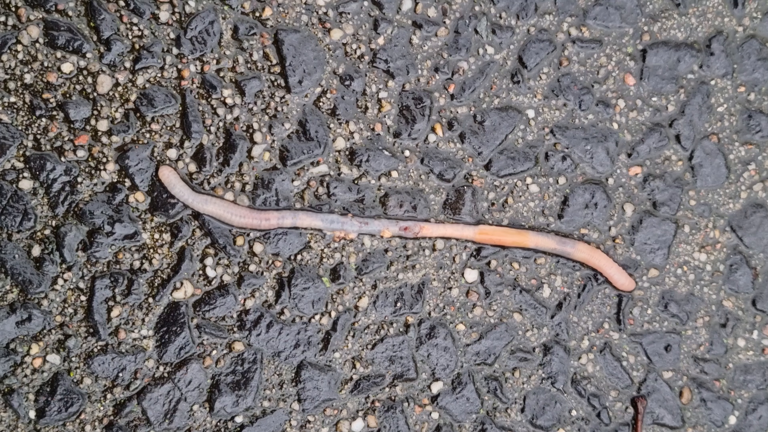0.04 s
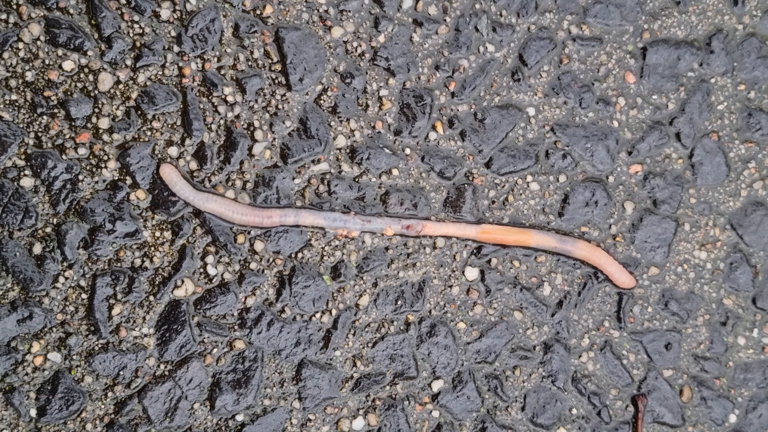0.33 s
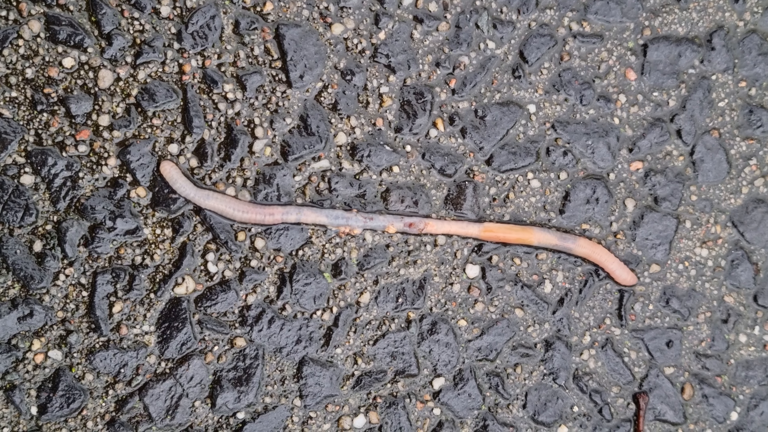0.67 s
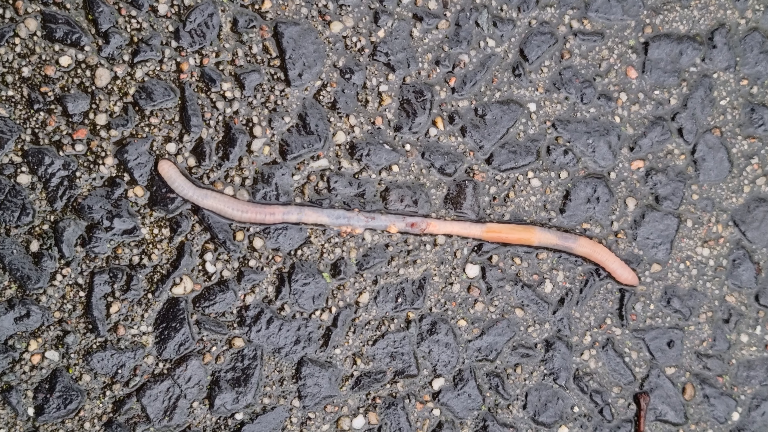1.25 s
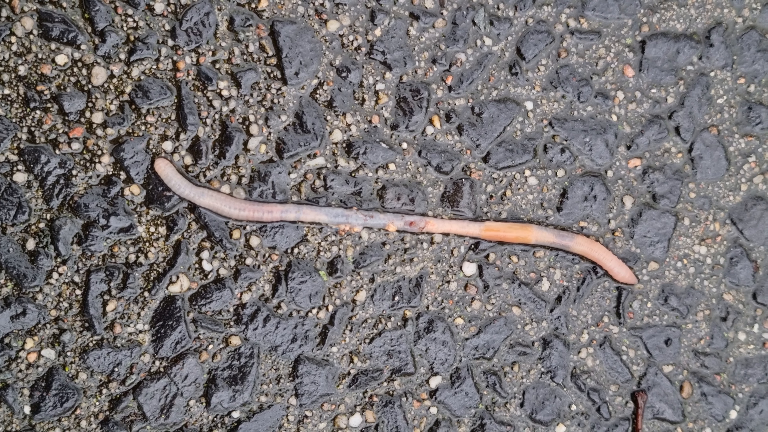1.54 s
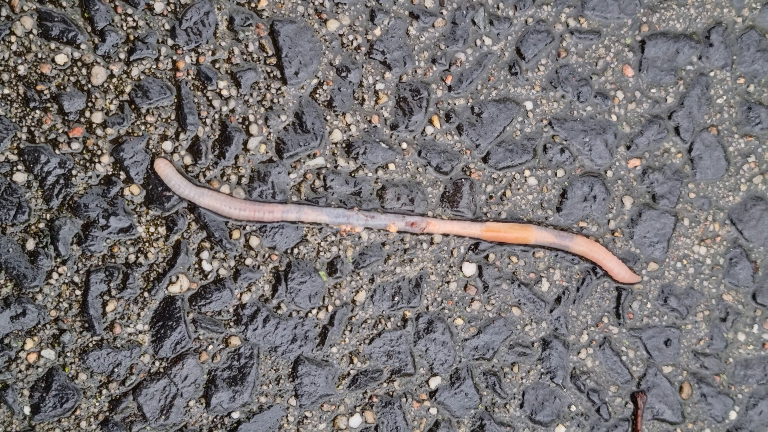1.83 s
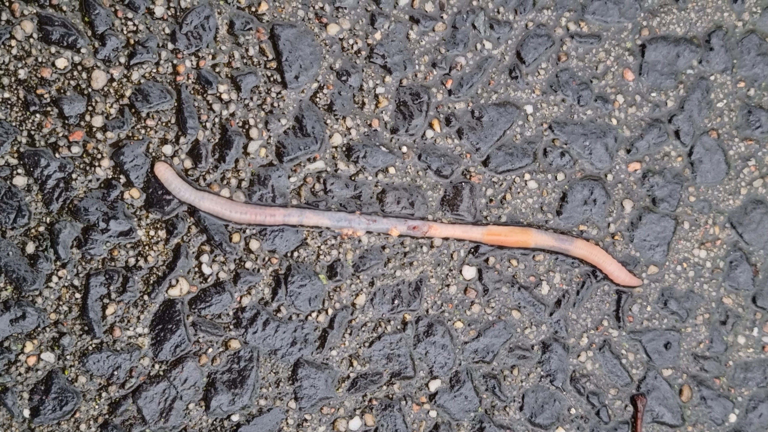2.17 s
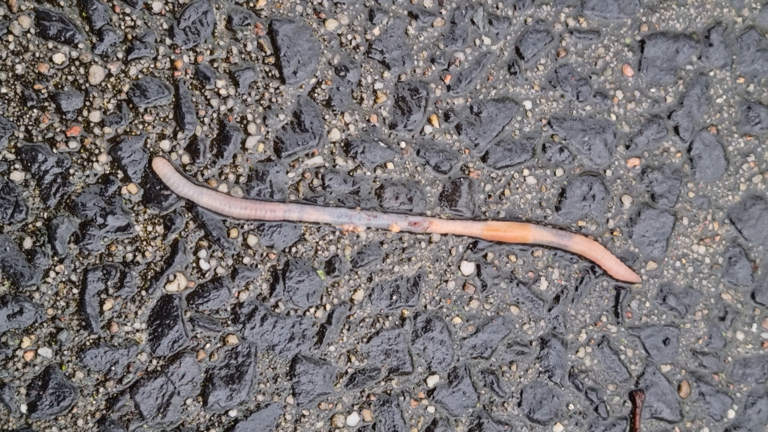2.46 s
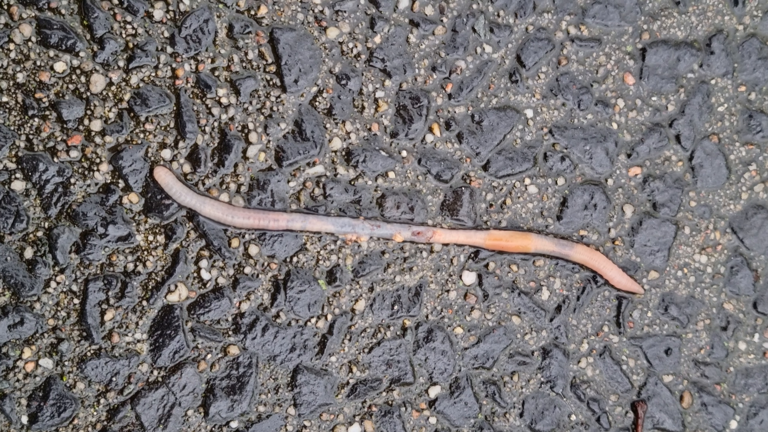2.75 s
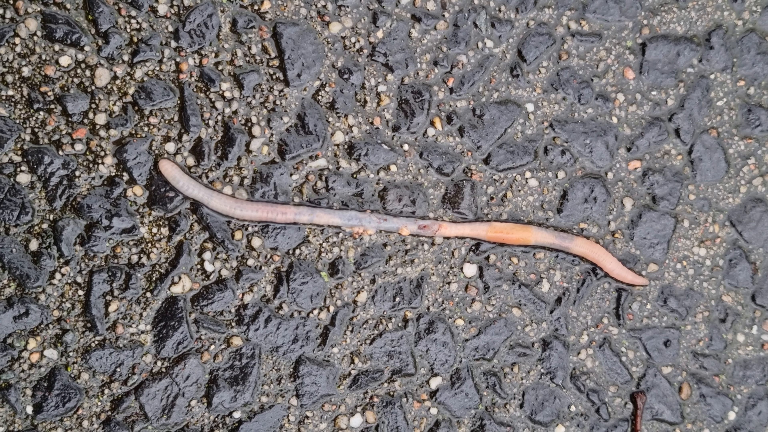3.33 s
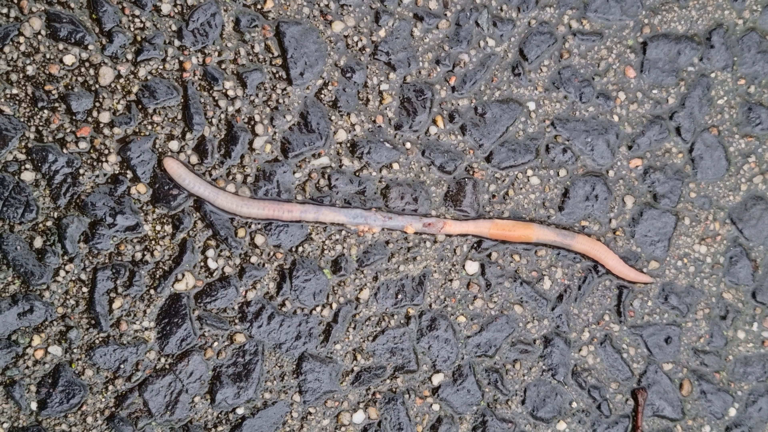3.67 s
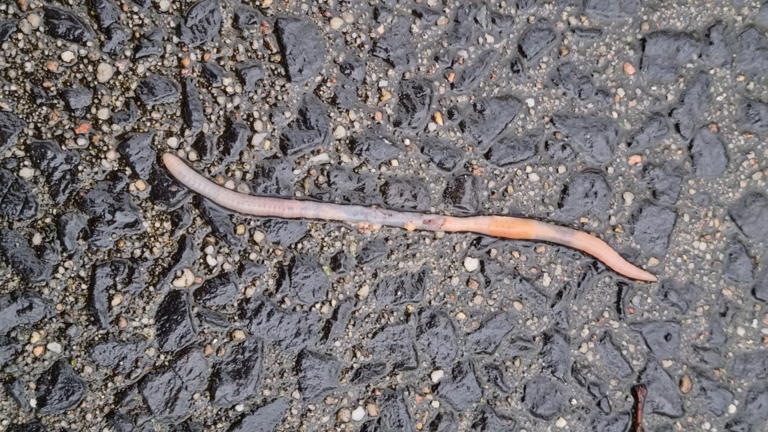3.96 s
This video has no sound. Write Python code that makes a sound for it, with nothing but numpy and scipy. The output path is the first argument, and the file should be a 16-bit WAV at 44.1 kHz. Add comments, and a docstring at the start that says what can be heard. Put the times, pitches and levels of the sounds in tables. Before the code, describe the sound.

Jackdaws call on and off around a paved yard, each short call starting raspy and sliding down. Some are near, others duller and farther away. A small songbird adds a chirrup and thin pips over faint traffic rumble.

```python
"""Jackdaws around a paved yard

Jackdaw-like birds call from their perches: each call starts as a rattling rasp and slides down as a
clearer tone. A small songbird adds a chirrup and thin high pips, among far whistles and one soft knock.
Walls scatter these sounds, and fainter jackdaws arrive duller and with more reflections.
Underneath lie outdoor air, a blur of distant birds, traffic rumble and an engine drone."""
import sys
import numpy as np
from scipy import signal
from scipy.fft import rfft, irfft
from scipy.io import wavfile

SR = 44100
rng = np.random.default_rng(int(sys.argv[2]) if len(sys.argv) > 2 else 0)


def digitize_waveform(pressure):
    """Quantize a signal to 16-bit integers and store it at the path in sys.argv[1].

    Rows of a 2-D input are taken as channels; values are limited to [-1, 1].
    """
    field = np.atleast_2d(pressure).T
    bounded = np.clip(field, -1, 1)
    quanta = np.round(bounded * 32767).astype(np.int16)
    wavfile.write(sys.argv[1], SR, quanta)


N = 176400
T = np.arange(N) / SR


def from_db(db):
    """Decibels to gain."""
    return 10 ** (np.asarray(db) / 20)


def unit_rms(x):
    """Scale to an RMS of one."""
    return x / np.sqrt(np.mean(x ** 2) + 1e-20)


def along(rows, t):
    """Read each curve of a breakpoint table at the times t."""
    times, *columns = np.transpose(rows)
    return [np.interp(t, times, column) for column in columns]


def at_hz(points, hz):
    """Read a curve on a log-frequency axis."""
    freqs, values = np.transpose(points)
    return np.interp(np.log(hz + 1), np.log(freqs), values)


def noise(spectrum, size):
    """Noise shaped by an EQ curve, at unit RMS."""
    gain = from_db(at_hz(spectrum, np.fft.rfftfreq(size, 1 / SR)))
    return unit_rms(irfft(rfft(rng.standard_normal(size)) * gain, size))


def drift(rate_hz, size):
    """Smooth random wander at unit RMS, mostly slower than rate_hz."""
    f = np.fft.rfftfreq(size, 1 / SR)
    return unit_rms(irfft(rfft(rng.standard_normal(size)) / (1 + (f / rate_hz) ** 2), size))


def lowpass(x, cutoff_hz):
    """Roll off the top at 12 dB per octave."""
    return signal.sosfilt(signal.butter(2, cutoff_hz, fs=SR, output="sos"), x)


def phase_of(hz):
    """Running phase of a gliding pitch."""
    return 2 * np.pi * np.cumsum(hz) / SR


def two_ears(x, lag_s):
    """Mono to stereo; a positive lag reaches the right side later."""
    i = np.arange(len(x))
    return np.array([x, np.interp(i - lag_s * SR, i, x)])


def add(out, start_s, x):
    """Mix a stereo sound in at its cue."""
    i = max(int(start_s * SR), 0)
    out[:, i:i + x.shape[1]] += x[:, :N - i]


EARLY_T60_S, LATE_T60_S, ECHOES_PER_S = 0.21, 0.8, 1500
def yard(x, wet_db, pan_db, late_db=-16, lag_s=0.0004276):
    """Direct sound, a quick scatter off the walls and a long, duller tail; positive pan is left."""
    t = T[:SR]
    early = rng.standard_normal((2, SR)) * (rng.random((2, SR)) < ECHOES_PER_S / SR)
    early *= from_db(-60 * t / EARLY_T60_S)
    late = lowpass(rng.standard_normal((2, SR)), cutoff_hz=5400)
    late *= from_db(-60 * t / LATE_T60_S) * (1 - np.exp(-t / 0.0033))
    wet, tail = from_db(wet_db), from_db(late_db)
    echoes = wet * (unit_rms(early) + tail * unit_rms(late)) / np.sqrt(SR * (1 + tail ** 2))
    out = signal.fftconvolve(x[None], echoes, axes=1)
    out[:, :len(x)] += two_ears(x, lag_s)
    return out * from_db([[pan_db / 2], [-pan_db / 2]]) / np.sqrt(1 + wet ** 2)


# Colour of the outdoor air: freq_hz, gain_db
AIR_EQ = [(150, -34), (400, -0.5), (750, -0.5), (1100, -3), (1600, -1.5), (2400, -11), (3300, -12.5),
          (4300, -10.5), (5500, -19), (7000, -23), (9500, -25.5), (12500, -29), (15000, -22.5)]
# Fader ride of the air: time_s, level_db
AIR_FADER = [(0, -62), (1, -61), (2, -62.5), (2.7, -63.5), (3.2, -65), (4, -63.5)]
# How alike left and right are: freq_hz, correlation
AIR_CORRELATION = [(150, 0.62), (350, 0.64), (700, 0.21), (1400, -0.18), (3000, 0.077), (15000, -0.17)]
def air():
    """A wide, even bed of outdoor hiss, built as mid and side."""
    alike = at_hz(AIR_CORRELATION, np.fft.rfftfreq(N, 1 / SR))
    mid = irfft(rfft(noise(AIR_EQ, N)) * np.sqrt((1 + alike) / 2), N)
    side = irfft(rfft(noise(AIR_EQ, N)) * np.sqrt((1 - alike) / 2), N)
    return np.array([mid + side, mid - side]) * from_db(along(AIR_FADER, T)[0])


# Note of a distant engine: time_s, pitch_hz
ENGINE_GLIDE = [(0, 53.5), (.6, 58), (.85, 63), (1.15, 57.5), (1.4, 60), (1.65, 64.5), (1.85, 60),
                (2.1, 56.5), (2.95, 56.5), (3.3, 49.5), (4, 49)]
# Fader ride of the engine, before trim and waver: time_s, level_db
ENGINE_FADER = [(0.0, -39), (0.03, -67), (0.47, -44.5), (0.7, -53), (0.82, -44.5), (1.18, -42.5),
                (1.27, -72), (1.34, -45.5), (1.57, -53), (1.6, -33), (1.76, -52.5), (1.83, -38.5),
                (1.87, -52), (2.45, -50), (2.72, -52), (2.95, -47), (3.11, -76), (3.41, -51.5), (3.99, -67),
                (4.0, -65.5)]
# Colour of the road rumble, before its low-pass: freq_hz, gain_db
RUMBLE_EQ = [(20, -1.5), (32, -33), (48, 4), (65, -0.5), (85, -3), (115, -5.5), (160, -12.5), (250, -16.5),
             (320, -18.5), (420, -29.5), (700, -25.5)]
# Fader ride of the rumble, before trim: time_s, level_db
RUMBLE_FADER = [(0.0, -58), (0.44, -59), (0.57, -55.5), (0.71, -59.5), (0.77, -57.5), (1.3, -60.5),
                (1.34, -57), (3.41, -62), (4.0, -56.5)]
ENGINE_TRIM_DB, RUMBLE_TRIM_DB = -0.5, 11
ENGINE_WAVER_HZ, ENGINE_WAVER_DB = 1.88, 3.5
def traffic():
    """A wavering engine drone in broad road rumble, leaning slightly right."""
    hz = along(ENGINE_GLIDE, T)[0] + ENGINE_WAVER_HZ * drift(rate_hz=4.15, size=N)
    db = along(ENGINE_FADER, T)[0] + ENGINE_TRIM_DB + ENGINE_WAVER_DB * drift(rate_hz=13.4, size=N)
    drone = np.sqrt(2) * np.sin(phase_of(hz)) * from_db(db)
    rumble = lowpass(noise(RUMBLE_EQ, N), cutoff_hz=700)
    rumble *= from_db(along(RUMBLE_FADER, T)[0] + RUMBLE_TRIM_DB)
    return (two_ears(drone, lag_s=0.0013) + two_ears(rumble, lag_s=0.0004)) * from_db([[-.4], [.4]])


# A narrow, hollow band of traffic noise: freq_hz, gain_db
SWELL_EQ = [(120, -46), (225, -22), (250, 6), (300, 0), (350, -6), (700, -81)]
# Its rise and fall: time_s, level_db
SWELL_FADER = [(1.1, -90), (1.4, -61.5), (1.6, -65.5), (1.8, -72), (2.1, -93)]
def traffic_swell():
    """The traffic noise briefly gains a low, hollow tone."""
    return two_ears(noise(SWELL_EQ, N) * from_db(along(SWELL_FADER, T)[0]), lag_s=0.00046)


# Colour of the distant bird wash: freq_hz, gain_db
CHORUS_EQ = [(1200, -32), (2000, -3), (2800, -6), (3500, -2), (4300, 0), (5000, -9), (5900, -12),
             (7000, -22.5), (10000, -35.5)]
# Its ebb and flow: time_s, level_db
CHORUS_FADER = [(0, -88), (.45, -62), (.7, -66.5), (1.05, -64), (1.5, -66.5), (1.9, -72.5), (2.3, -67.5),
                (2.7, -61), (3.15, -80), (3.4, -72.5), (4, -69)]
def distant_chorus():
    """Birds too far off to tell apart blur into a wide band of noise."""
    return np.array([noise(CHORUS_EQ, N), noise(CHORUS_EQ, N)]) * from_db(along(CHORUS_FADER, T)[0])


# Resonances of the knock: freq_hz, relative_db, t60_s
KNOCK_MODES = [(1500, -5, .012), (2000, -2, .016), (2400, -2, .012), (3600, -3, .008), (5200, -4, .008),
               (6100, -6, .008), (7200, -4, .008)]
def knock(start_s=1.005, level_db=-41, attack_s=.002):
    """One small knock rings a few quickly damped modes."""
    out, t = np.zeros((2, N)), T[:SR // 10]
    ring = sum(from_db(level_db + db - 60 * t / t60) * np.sin(2 * np.pi * hz * t)
               for hz, db, t60 in KNOCK_MODES)
    add(out, start_s, yard(ring * (1 - np.exp(-t / attack_s)), wet_db=-2, pan_db=0))
    return out


TREMBLE_HZ = 510  # speed of the random tremble in the birds' voices
def whistle(contour, jitter, harmonics_db=(0,)):
    """A trembling bird note that glides through rows of time_s, pitch_hz, level_db."""
    t = np.arange(contour[0][0], contour[-1][0], 1 / SR)
    hz, db = along(contour, t)
    phase = phase_of(hz * (1 + jitter * drift(TREMBLE_HZ, size=16384)[:len(t)]))
    tone = sum(from_db(gain_db) * np.sin(k * phase) for k, gain_db in enumerate(harmonics_db, 1))
    return np.sqrt(2) * from_db(db) * signal.windows.tukey(len(t), .05) * tone


# Faint held notes: start_s, length_s, pitch_hz, level_db
WHISTLE_CUES = [(0.62, .055, 4280, -63.5), (1.307, .058, 4160, -76), (1.95, 0.21, 4230, -65),
                (2.255, 0.22, 4350, -73), (3.442, 0.1, 3980, -63.5), (3.538, .03, 4250, -61)]
def far_whistles():
    """Steady whistles from far off, more reflection than direct sound."""
    out = np.zeros((2, N))
    for start, length, hz, db in WHISTLE_CUES:
        note = whistle([(start, hz, db), (start + length, hz, db)], jitter=.03)
        add(out, start, yard(note, wet_db=4, pan_db=-2.5, late_db=-7))
    return out


# Thin, high pips: start_s, length_s, from_hz, to_hz, level_db
PIP_CUES = [(0.442, 0.013, 5480, 6170, -58.5), (0.458, 0.013, 5830, 5300, -63),
            (1.108, .013, 5380, 5980, -53.5), (1.126, 0.0091, 6350, 6400, -64),
            (1.168, 0.0098, 5900, 5530, -59), (1.517, 0.014, 5490, 5830, -55.5),
            (1.532, 0.0076, 6400, 6320, -62), (1.552, 0.02, 5860, 5800, -67),
            (1.584, 0.018, 5690, 5680, -58.5), (1.602, 0.017, 5130, 4750, -56.5),
            (1.633, 0.011, 4700, 4600, -55), (1.65, 0.013, 4960, 4660, -58.5),
            (1.705, 0.013, 3760, 3710, -59.5), (1.858, 0.021, 2590, 3240, -60),
            (1.952, 0.043, 6060, 5560, -66), (2.581, 0.0087, 3920, 3780, -49.5),
            (2.626, 0.014, 4270, 4190, -55), (2.772, 0.014, 4940, 5140, -57.5),
            (2.825, 0.016, 5300, 4700, -62), (3.283, 0.014, 5330, 6130, -64), (3.3, .014, 6260, 6200, -71),
            (3.344, 0.021, 5440, 5770, -59.5), (3.376, 0.014, 5400, 5130, -68),
            (3.404, 0.013, 4740, 4670, -63)]
def songbird_pips():
    """Tiny, distant glides, each faded in and out and smeared by the walls."""
    out = np.zeros((2, N))
    for start, length, from_hz, to_hz, db in PIP_CUES:
        pip = whistle([(start, from_hz, db), (start + length, to_hz, db)], jitter=.028)
        pip *= signal.windows.tukey(len(pip), .5)
        add(out, start, yard(pip, wet_db=5, pan_db=1, late_db=-7, lag_s=-0.00038))
    return out


# Zigzag of the close chirrup: time_s, pitch_hz, level_db
CHIRRUP_CONTOUR = [(.825, 2600, -68), (.843, 3050, -52), (.847, 3500, -51), (.851, 4700, -42),
                   (.859, 5150, -38.5), (.867, 4450, -41), (.878, 4150, -42), (.884, 2750, -48),
                   (.893, 3450, -42), (.902, 4400, -42), (.915, 3300, -41.5), (.919, 3600, -46),
                   (.925, 2850, -55)]
# Colour of its sizzle: freq_hz, gain_db
SIZZLE_EQ = [(2500, -30), (6000, 4.5), (7500, 3), (10000, -4), (12000, -27), (15500, -3)]
def songbird_chirrup(octave_db=-23, sizzle_db=-25):
    """A quick zigzag whistle with a faint octave and a sizzle that rides on the tone."""
    out = np.zeros((2, N))
    tone = whistle(CHIRRUP_CONTOUR, jitter=.033, harmonics_db=[0, octave_db])
    sizzle = from_db(sizzle_db) * np.abs(tone) * noise(SIZZLE_EQ, size=8192)[:len(tone)]
    placed = yard(tone + sizzle, wet_db=-2, pan_db=-0.5, late_db=-9, lag_s=.00032)
    add(out, CHIRRUP_CONTOUR[0][0], placed)
    return out


# Arc of one soft call: time_s, pitch_hz, relative_db
RISING_CONTOUR = [(1.945, 1097, -76), (1.975, 1400, -65.5), (1.999, 1662, -55.5), (2.023, 1913, -55),
                  (2.04, 1580, -56.5), (2.05, 1370, -68)]
# Its harmonics, from the fundamental up: gain_db
RISING_HARMONICS = [-5, 5.5, -17, -27]
def rising_call():
    """A soft call, strongest in its second harmonic, climbs and then drops."""
    out = np.zeros((2, N))
    call = whistle(RISING_CONTOUR, jitter=0.027, harmonics_db=RISING_HARMONICS)
    add(out, RISING_CONTOUR[0][0], yard(call, wet_db=-2, pan_db=-3, lag_s=0))
    return out


# Shape of one call, with position and roughness from 0 to 1 and the partials' relative levels:
# position, base_pitch_hz, fundamental_db, second_harmonic_db, upper_harmonics_db, roughness
CALL_SHAPE = [(0, 1476, -41, -32, -21.5, 0.49), (.1, 1554, -17, -10.5, -9, 0.83),
              (.24, 1583, -15, -22, -1, 0.7), (.35, 1684, -19.5, -5.5, -4, 0.37),
              (.44, 1746, -8, 4.5, -5.5, 0.49), (.53, 1605, -13.5, -0.5, -10.5, 0.43),
              (.63, 1447, -13, 0.5, -12.5, 0.19), (.8, 1275, -17, -5, -18, 0.1),
              (.92, 1172, -17.5, -10.5, -23.5, 0.4), (1, 1016, -39, -8, -38, 0.4)]
# Throat colour on the upper harmonics and rasp: freq_hz, gain_db
THROAT_EQ = [(1000, -16.5), (2200, -10), (3200, -5), (4000, 4.5), (4700, -5), (5600, -5), (6900, -15.5),
             (7900, -17), (9300, -32), (11500, -27), (15500, -33)]
RING_HZ, RING_HALF_WIDTH_HZ, RING_DB = 4720, 300, 6  # an extra throat resonance
PITCH_JITTER, FLUTTER_DEPTH, RATTLE_DEPTH = 0.0627, .55, .65  # at full roughness
RATTLE_HZ, RASP_DB = 295, -2.5
def jackdaw_call(length_s, pitch_ratio, tilt_db, min_roughness, dull_db):
    """A rattling onset rings in the throat, then clears into a falling tone on the second harmonic."""
    size = int(length_s * SR)
    hz, fundamental_db, second_db, upper_db, roughness = along(CALL_SHAPE, np.arange(size) / size)
    roughness = np.clip(roughness, min_roughness, 1)
    wander = lambda: drift(TREMBLE_HZ, size=8192)[:size]
    phase = phase_of(pitch_ratio * hz * (1 + PITCH_JITTER * roughness * wander()))
    harmonic = lambda k: np.sqrt(2) * np.sin(k * phase) * (1 + FLUTTER_DEPTH * roughness * wander())
    rattle = 1 + RATTLE_DEPTH * roughness * np.sin(phase_of(RATTLE_HZ * (1 + 0.09 * wander())))
    hiss = np.sqrt(SR / 2 / hz) * rng.standard_normal(8192)[:size]
    rasp = hiss * (1 + np.cos(phase)) * from_db(RASP_DB)  # pulses once per pitch cycle
    upper = (sum(harmonic(k) for k in range(3, 10)) + rasp) * from_db(upper_db - dull_db) * rattle
    f = np.fft.rfftfreq(2 * size, 1 / SR)
    ring_db = RING_DB / (1 + ((f - RING_HZ) / RING_HALF_WIDTH_HZ) ** 2)
    treble_db = tilt_db * np.log2(np.clip(f / 3300, 1, 3))
    throat = from_db(at_hz(THROAT_EQ, f) + ring_db + treble_db)
    upper = irfft(rfft(upper, 2 * size) * throat)[:size]
    body = from_db(fundamental_db) * harmonic(0.99) + from_db(second_db) * harmonic(2)
    return (upper + rattle * body) * signal.windows.tukey(size, .1)


# Cue sheet of the jackdaws:
# start_s, length_s, pitch_ratio, level_db, tilt_db_per_octave, pan_db, min_roughness, right_lag_s
JACKDAW_CUES = [(0.139, .11, 1.12, -52.5, 0, -1, .55, .0004), (.24, 0.11, 0.97, -36, -1.5, 3.5, .1, .00039),
                (.477, 0.12, 0.97, -38, 3, 1.5, .1, .00039), (1.163, 0.13, 1.06, -47.5, 1, 0, .7, .0005),
                (2.191, 0.098, 0.98, -49.5, 1, -1.5, .6, .00032),
                (2.36, .12, 1.03, -45.5, -4.5, 0.5, .65, .0005),
                (2.404, .11, 1.05, -45.5, 1, -1.5, .65, -.0003),
                (2.672, .13, 0.82, -60.5, 7, -1, 1.1, .0004), (2.867, .112, 0.97, -39, 2, 1.5, .1, .0004),
                (3.472, 0.12, 0.98, -52.5, -2, 1.5, .4, .00018),
                (3.576, .13, .92, -43.5, -4, 0, .62, .00043),
                (3.817, 0.12, 0.98, -37.5, 2, 3.5, .1, .00039)]
NEAR_DB, NEAR_WET_DB = -33, -4.5  # level and reverb send of a close caller
WET_PER_DB, DULL_PER_DB = .5, 0.7  # dB of reverb gained and of top lost per dB fainter
def jackdaws():
    """Callers around the yard: a fainter one is farther away, so it is duller and wetter."""
    out = np.zeros((2, N))
    for start, length, pitch_ratio, db, tilt_db, pan_db, min_roughness, lag_s in JACKDAW_CUES:
        fainter_db = NEAR_DB - db
        wet_db = NEAR_WET_DB + WET_PER_DB * fainter_db
        call = jackdaw_call(length, pitch_ratio, tilt_db, min_roughness, DULL_PER_DB * fainter_db)
        add(out, start, from_db(db) * yard(call, wet_db, pan_db, lag_s=lag_s))
    return out


def scene():
    """Birds and a knock over the outdoor bed."""
    birds = jackdaws() + rising_call() + songbird_chirrup() + songbird_pips() + far_whistles()
    return birds + distant_chorus() + knock() + traffic() + traffic_swell() + air()


LOW_CUT_HZ, HIGH_CUT_HZ = 18, 15600
def record(dry):
    """A gentle cut of the deepest bass and a steep cut of the very top."""
    dry = signal.sosfilt(signal.butter(2, LOW_CUT_HZ, "high", fs=SR, output="sos"), dry)
    return signal.sosfilt(signal.ellip(12, .1, 80, HIGH_CUT_HZ, fs=SR, output="sos"), dry)


dry = scene()
out = record(dry)
digitize_waveform(out)
```